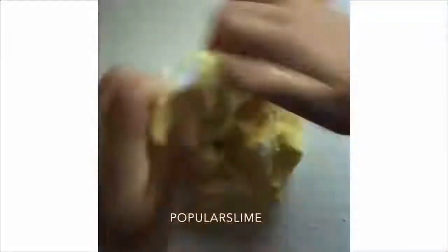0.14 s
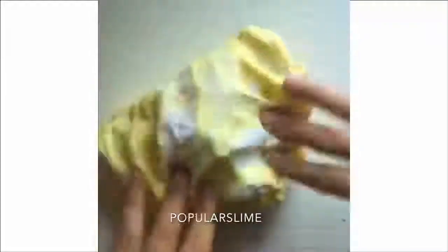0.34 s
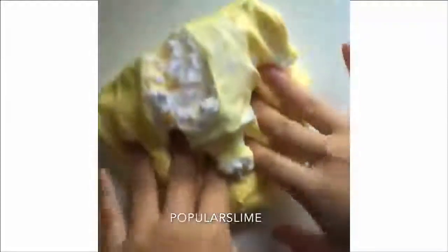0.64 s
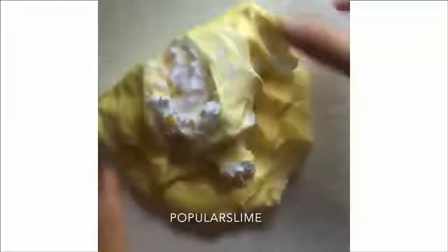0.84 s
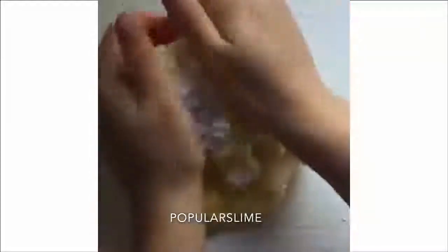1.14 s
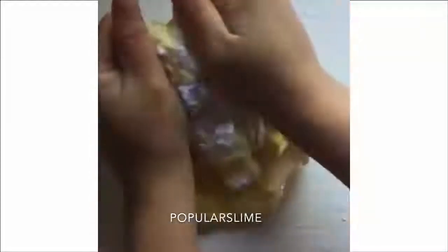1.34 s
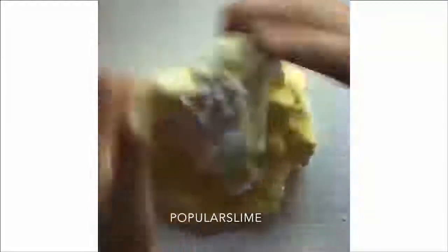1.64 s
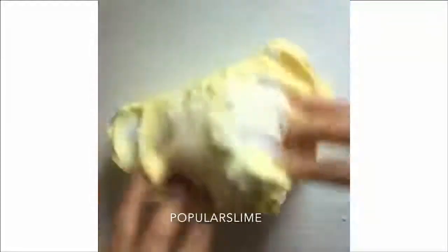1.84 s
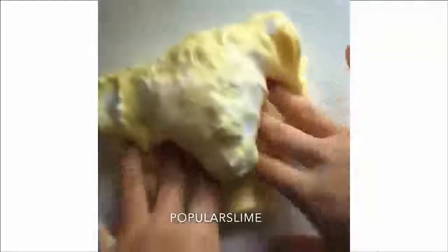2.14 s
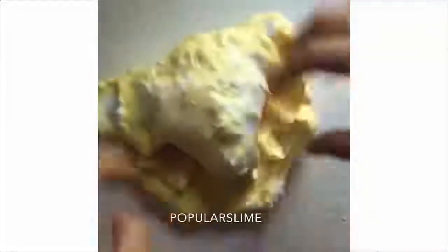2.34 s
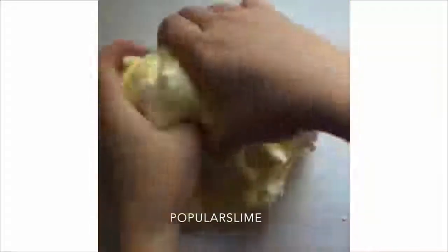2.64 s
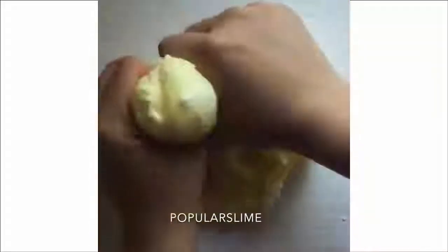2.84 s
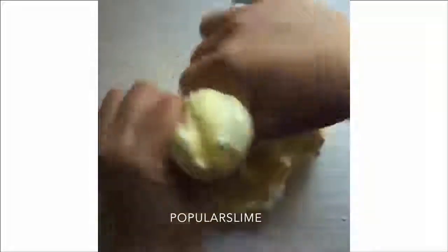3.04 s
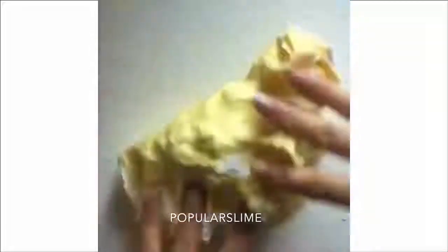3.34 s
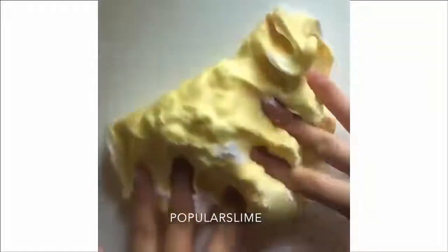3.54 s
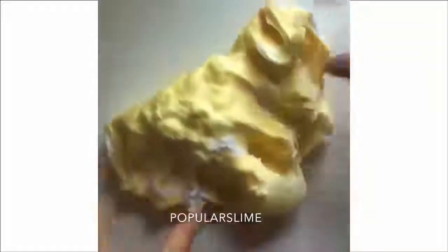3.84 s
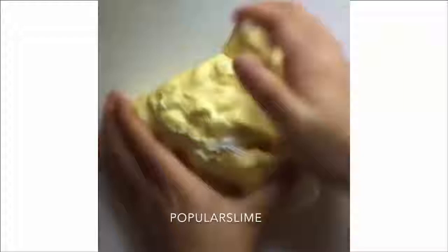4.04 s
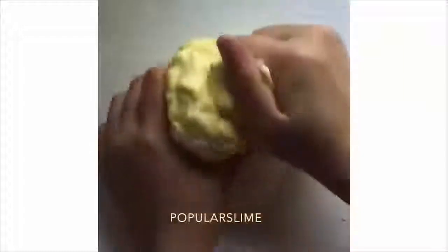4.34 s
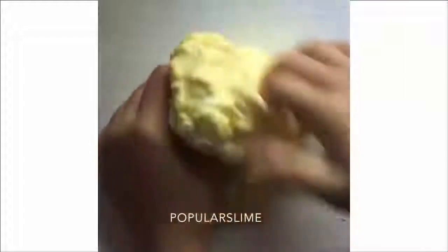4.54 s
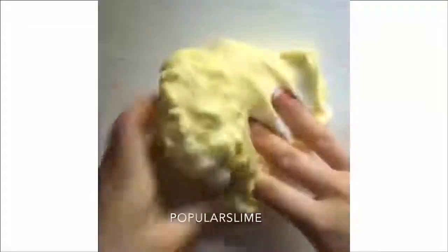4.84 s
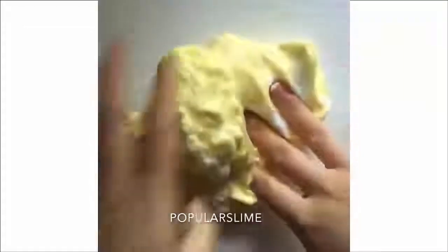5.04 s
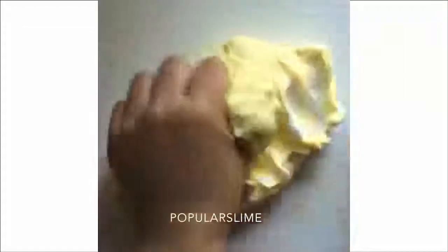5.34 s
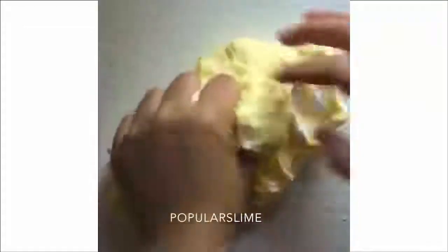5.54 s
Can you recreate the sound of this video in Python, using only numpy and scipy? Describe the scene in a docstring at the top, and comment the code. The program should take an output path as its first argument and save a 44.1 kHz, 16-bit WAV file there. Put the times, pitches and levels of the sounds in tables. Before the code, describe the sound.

A burst of loud, snapping pops opens as hands squeeze airy slime close to the microphone. Short, fizzy squelches follow in uneven strokes, mixed with hollow palm slaps, small gurgles and low thuds from the table. More clusters of bursting air pockets come about every second and a half, then a tiny air squeak and a final pop. The room is quiet, with faint hiss and little echo.

```python
"""Air pockets burst in a lump of thick, airy slime as two hands knead it, close to a small microphone.
Palms land with hollow slaps and squeeze until the pockets tear, the loudest overloading the microphone.
Fingers crush the foam into a squelch and fizz of tiny bubbles, air gurgles through folds, and the table
thuds and rumbles in a quiet room. Near the end, air squeaks out through a slit."""
import sys
import numpy as np
from scipy import signal
from scipy.fft import rfft, irfft, next_fast_len
from scipy.io import wavfile
from scipy.ndimage import map_coordinates

SR = 44100
rng = np.random.default_rng(int(sys.argv[2]) if len(sys.argv) > 2 else 0)


def wrap_up_sound(samples):
    """Save the sound to the file named by the first command line argument, as 16-bit audio."""
    columns = np.atleast_2d(samples).T
    # keep every value between -1 and 1, then stretch to whole-number steps
    tamed = np.clip(columns, -1, 1)
    steps = np.round(tamed * 32767).astype(np.int16)
    wavfile.write(sys.argv[1], SR, steps)


N = 251370
TOP_HZ = 14150  # band limit


def amp(db):
    """Decibels to gain."""
    return 10 ** (np.asarray(db) / 20)


def unit(x):
    """Scale to rms 1."""
    return x / np.sqrt(np.mean(x ** 2) + 1e-20)


def along(points, hz):
    """Read a curve of (freq_hz, value) points on a log frequency axis."""
    freqs, values = np.transpose(points)
    return np.interp(np.log(hz + 1), np.log(freqs), values)


def add(track, start_s, sound):
    """Lay a sound into a track."""
    part = track[max(0, round(start_s * SR)):][:len(sound)]
    part += sound[:len(part)]


def filtered(x, response):
    """Filter x by a complex response of frequency."""
    size = next_fast_len(len(x) + SR // 10)
    return irfft(rfft(x, size) * response(np.fft.rfftfreq(size, 1 / SR)), size)[:len(x)]


def coloured(x, eq):
    """x through an EQ curve of (freq_hz, gain_db) points, at rms 1."""
    return unit(filtered(x, lambda hz: amp(along(eq, hz))))


def causal(gain):
    """Minimum-phase impulse response of a gain curve."""
    cepstrum = irfft(np.log(gain + 1e-6))
    half = len(cepstrum) // 2
    folded = np.r_[cepstrum[0], 2 * cepstrum[1:half], np.zeros(half)]
    return irfft(np.exp(rfft(folded)))


def resonance(f, hz, width):
    """Response of one damped mode."""
    return 1j * f * width / (hz * hz - f * f + 1j * f * width)


def swell(length_s):
    """A soft rise and fall that lasts about length_s."""
    u = np.arange(int(2 * length_s * SR)) / (0.47 * length_s * SR)
    return u ** 2 * np.exp(2 - 2 * u)


def wobble(per_second):
    """A smooth random curve with so many knots a second."""
    knots = rng.standard_normal(int(N * per_second / SR) + 4)
    return map_coordinates(knots, [np.arange(N) * per_second / SR])


# EQ of the noise floor: freq_hz, gain_db
ROOM_TONE_EQ = [(18, -36), (30, -6.5), (65, -6), (172, -4), (435, -19), (1190, -23.5), (6470, -28.5),
                (10600, -31), (12600, -28), (14000, -35)]


def room_tone(level_db=-59):
    """A faint, steady bed of low noise and hiss."""
    return amp(level_db) * coloured(rng.standard_normal(N), ROOM_TONE_EQ)


# Reverb time of the walls: freq_hz, t60_s
WALL_DECAY = [(200, 0.12), (2000, 0.39), (6000, 0.34), (13000, .28)]


def room_reverb(x, near_db=-11, near_t60_s=0.054, far_db=-17, blocks=20):
    """Hands and table scatter the sound, the walls add a faint tail; the paths change as the hands move."""
    out, step = np.zeros(N), N // blocks + 1
    for start in range(0, N, step):
        hz, t, bands = signal.stft(rng.standard_normal(SR // 2), SR, nperseg=256)
        decay = amp(-60 * t / along(WALL_DECAY, hz)[:, None])
        tail = signal.istft(bands * decay, SR, nperseg=256)[1]
        t = np.arange(len(tail)) / SR
        tail *= 1 - np.exp(-t / 0.015)
        near = rng.standard_normal(len(t)) * amp(-60 * t / near_t60_s) * (t > .004)
        impulse = amp(far_db) * tail / np.linalg.norm(tail) + amp(near_db) * near / np.linalg.norm(near)
        add(out, start / SR, signal.fftconvolve(x[start:start + step], impulse))
    return out


# Drags of the lump over the table: start_s, level_db, length_s
DRAGS = [(0.36, -48, 0.084), (0.867, -35, 0.089), (1.086, -43.5, 0.095), (1.16, -34.5, 0.057),
         (1.427, -42, 0.069), (1.87, -41, 0.066), (2.433, -36.5, .13), (3.245, -35.5, 0.12),
         (3.72, -47, 0.066), (3.872, -34.5, 0.0886), (4.116, -53, 0.19), (5.048, -36.5, 0.079),
         (5.316, -41, 0.096)]
# EQ of the drag rumble: freq_hz, gain_db
RUMBLE_EQ = [(15, -40), (25, -20), (65, -0.5), (86, -4), (135, -13.5), (190, -4), (242, -34.5), (320, -37),
             (420, -58.5), (700, -120)]
# Pushes booming through lump and table, plus at 2.718 s the low thump of air trapped under a palm: start_s,
# level_db, length_s, pitch_hz
PUSHES = [(0.078, -30, 0.023, 192), (0.885, -29, 0.037, 171.2), (0.912, -21.5, 0.04, 175.6),
          (1.072, -17, 0.033, 181), (1.21, -45.5, 0.089, 178), (1.328, -44.5, 0.04, 180),
          (2.422, -19.5, 0.035, 171), (2.472, -20.5, 0.027, 170.3), (2.66, -35, 0.037, 175),
          (2.718, -27.5, 0.025, 283.5), (3.245, -34.5, 0.086, 162.7), (3.852, -27.5, 0.062, 171.3),
          (4.08, -23.5, 0.038, 177.5), (4.105, -26.5, 0.062, 181), (4.2, -31.5, 0.078, 182),
          (4.51, -36.5, 0.034, 184), (4.97, -31.5, 0.085, 167), (5.045, -34.5, 0.076, 176),
          (5.305, -35.5, 0.067, 173.6), (5.585, -35.5, 0.0099, 227)]


def table_top(rest_db=-56, roughness=0.33):
    """The table top rumbles as the lump is dragged and booms under each push; one boom is the low thump of air
    trapped under a palm."""
    motion = np.full(N, amp(rest_db))
    for start_s, level_db, length_s in DRAGS:
        add(motion, start_s, amp(level_db) * swell(length_s))
    out = motion * coloured(rng.standard_normal(N), RUMBLE_EQ)
    drag_eq = [(30, -17), (70, 1), (200, 1.5), (320, -8.5), (600, -23), (2000, -72)]
    for start_s, level_db, length_s, pitch_hz in PUSHES:
        push = swell(length_s)
        boom = np.sqrt(2) * np.sin(2 * np.pi * pitch_hz * np.arange(len(push)) / SR)
        drag = coloured(rng.standard_normal(len(push)), drag_eq)
        add(out, start_s, amp(level_db) * push * (boom + roughness * drag))
    return out


# Puffs of air squeezed through folds: start_s, level_db, length_s, centre_hz
PUFFS = [(0.323, -30.5, 0.033, 2350), (0.865, -44.5, 0.022, 2600), (1.235, -51, 0.018, 1900),
         (2.15, -43, 0.0077, 1337), (2.18, -47, 0.013, 4900), (2.396, -47, 0.032, 2430),
         (2.42, -32.5, 0.011, 3730), (2.769, -52, 0.041, 2150), (3.249, -28, 0.031, 1245),
         (3.838, -42.5, 0.025, 1148), (3.884, -33, 0.025, 1215), (4.206, -48, 0.013, 2970),
         (4.315, -42.5, 0.017, 1090), (4.435, -41, 0.017, 890), (4.47, -43, 0.0067, 1060),
         (4.646, -37.5, 0.075, 1030), (4.689, -32, 0.02, 3700), (5.003, -30.5, 0.025, 1120)]


def gurgles(fold_q=2.9):
    """Air slips through a fold, which colours it with one broad resonance."""
    out = np.zeros(N)
    for start_s, level_db, length_s, hz in PUFFS:
        flow = swell(length_s)
        air = filtered(rng.standard_normal(len(flow)), lambda f: resonance(f, hz, hz / fold_q) ** 2)
        add(out, start_s, amp(level_db) * flow * unit(air))
    return out


# Pitch and level envelope of the squeak: time_s, pitch_hz, level_db
SQUEAK_ENVELOPE = [(5.385, 2027, -67), (5.401, 1880, -37), (5.406, 1902, -18), (5.411, 1878, -13),
                   (5.419, 1874, -17), (5.425, 1790, -35), (5.434, 1780, -75)]


def squeak(second_db=-27, third_db=-36):
    """Escaping air flutters the lips of a slit: a falling, nearly pure tone."""
    t = np.arange(N) / SR
    time_s, pitch_hz, level_db = np.transpose(SQUEAK_ENVELOPE)
    phase = 2 * np.pi * np.cumsum(np.interp(t, time_s, pitch_hz)) / SR
    tone = np.sin(phase) + amp(second_db) * np.sin(2 * phase) + amp(third_db) * np.sin(3 * phase)
    gate = (t > time_s[0]) * (t < time_s[-1])
    return np.sqrt(2) * amp(np.interp(t, time_s, level_db)) * tone * gate


# Modes of the hollow under a palm: pitch_hz, width_hz, gain_db
PALM_MODES = [(290.7, 27, -1.5), (648, 49, 0.5), (770, 110, -9), (1004, 65, -7), (1330, 81, -15.5),
              (1800, 150, -18)]
# Palms landing on the slime: start_s, level_db, t60_s, pitch_ratio
PALM_HITS = [(1.074, -20.5, 0.29, 1.01), (1.1, -25.5, 0.17, 0.95), (2.66, -33, 0.19, 0.94),
             (2.721, -27.5, 0.17, 0.81), (4.081, -24, 0.12, 0.96), (4.112, -32.5, 0.25, 1.01)]


def slaps(attack_s=.001, smack_db=-7, smack_t60_s=0.094):
    """A soft palm traps air against the slime: a short, hollow body under a faint smack."""
    def hollow(f):
        return sum((-1) ** k * amp(db) * resonance(f, hz, width)
                   for k, (hz, width, db) in enumerate(PALM_MODES))

    out, t = np.zeros(N), np.arange(SR // 4) / SR
    smack_eq = [(300, 6.5), (1500, 1.5), (4000, -13), (13000, -26)]
    for start_s, level_db, t60_s, pitch_ratio in PALM_HITS:
        noise = rng.standard_normal(len(t))
        body = unit(filtered(noise, lambda f: hollow(f / pitch_ratio) / (1 + (f / 2200) ** 4)))
        body *= amp(-60 * t / t60_s) * (1 - np.exp(-t / attack_s))
        smack = coloured(rng.standard_normal(len(t)), smack_eq) * amp(smack_db - 60 * t / smack_t60_s)
        add(out, start_s, amp(level_db) * (body + smack))
    return out


def sticky_ticks(per_second=130, spread_db=15.5, t60_s=0.022):
    """Sticky skin lets go of the fingers in sparse, sharp ticks."""
    out, t = np.zeros(N), np.arange(SR // 60) / SR
    for when, size in rng.random((int(per_second * N / SR), 2)):
        envelope = amp(spread_db * size - 60 * t / t60_s)
        add(out, when * N / SR, envelope * rng.standard_normal(len(t)))
    return unit(out)


def bubbles(per_second, low_hz, high_hz, cycles, level_spread=3):
    """Countless tiny cells of uneven size, each ringing for a few cycles at its own pitch."""
    when, pitch, softness, phase = rng.random((int(per_second * N / SR), 4)).T[:, :, None]
    hz = low_hz * (high_hz / low_hz) ** pitch
    n = np.arange(SR // 120)
    turns = hz * n / SR
    gain = amp(-level_spread * np.log(.04 + .96 * softness)) * hz  # many soft, a few loud
    envelope = amp(-60 * turns / cycles) * (1 - np.exp(-2 * turns)) * (1 - n / len(n))
    grains = gain * envelope * np.sin(2 * np.pi * (turns + phase))
    positions = (when * N).astype(int) + n
    return unit(np.bincount(positions.ravel(), grains.ravel(), N + len(n))[:N])


# Finger strokes through the foam: start_s, length_s, squelch_db, fizz_db, effort_change_db
FINGER_STROKES = [(0.01, 0.18, -33.5, -37, -4), (0.277, 0.12, -33, -34, -6.5), (0.696, 0.1, -47, -59, -12),
                  (0.894, .048, -27.5, -29.5, -9), (1.162, 0.098, -43, -48.5, 1.5), (1.31, .1, -57, -62, 3),
                  (1.446, 0.32, -40.5, -40, -0.5), (1.794, 0.11, -34, -33, -10),
                  (2.161, 0.17, -62, -60.5, -1.5), (2.431, 0.041, -23.5, -29.5, -8),
                  (2.69, 0.23, -62.5, -64.5, 1.5), (2.982, 0.3, -39, -35.5, -25),
                  (3.23, .1, -29, -30.5, -4.5), (3.369, 0.066, -50, -49, -1),
                  (3.854, 0.061, -37.5, -37.5, 3.5), (4.203, 0.15, -57, -56.5, 3),
                  (4.331, 0.305, -56.5, -52, 12), (4.679, 0.1, -36.5, -35.5, -5.5),
                  (4.911, 0.077, -33.5, -37, -2), (5.01, 0.093, -29, -34, -7.5),
                  (5.315, 0.081, -29, -35, -10.5), (5.616, 0.078, -32, -62, -9.5)]


def crushing(grip_db_per_s=678.5, release_db_per_s=394, usual_stroke_s=0.17):
    """Squelch and fizz envelopes: each stroke grips, presses on with changing effort and lets go."""
    t = np.arange(N) / SR
    squelch, fizz = amp(-62), amp(-68.5)  # the foam settling between strokes
    for start_s, length_s, squelch_db, fizz_db, change_db in FINGER_STROKES:
        grip_db = grip_db_per_s * np.minimum(t - start_s, 0)
        release_db = release_db_per_s * np.minimum(start_s + length_s - t, 0)
        pace = (usual_stroke_s / length_s) ** .5  # shorter strokes grip and let go faster
        progress = np.clip((t - start_s) / length_s, 0, 1)
        effort = amp(pace * (grip_db + release_db) + change_db * progress)
        squelch = np.hypot(squelch, amp(squelch_db) * effort)
        fizz = np.hypot(fizz, amp(fizz_db) * effort)
    return squelch, fizz


# EQ of the wet mids from large cells: freq_hz, gain_db
SQUELCH_EQ = [(150, -30), (250, -3.5), (443, -7.5), (634, -5.5), (764, -6.5), (1020, -3), (1230, -3.5),
              (1450, -10), (2130, -6), (6000, -16.5), (7800, -39.5), (13200, -120)]
# EQ of the crisp top from small cells: freq_hz, gain_db
FIZZ_EQ = [(2650, -22), (4500, -2), (7520, -3), (8230, -3), (10500, -8), (11800, -4.5), (14000, -7.5)]


def foam(trim_db=-1, stickiness=0.46, fizz_lumpiness=0.59):
    """Crushed foam: larger cells squelch in lumps and the smallest fizz, over a bed of escaping air."""
    squelch, fizz = crushing()
    ticks = stickiness * sticky_ticks()
    large = bubbles(1900, low_hz=450, high_hz=7000, cycles=13) + ticks + .65 * rng.standard_normal(N)
    small = bubbles(1200, low_hz=4000, high_hz=14000, cycles=18) + ticks + rng.standard_normal(N)
    lumps_db = 1.5 * wobble(per_second=70)  # the slime yields unevenly
    squelch *= amp(lumps_db) * coloured(large, SQUELCH_EQ)
    fizz *= amp(fizz_lumpiness * lumps_db) * coloured(small, FIZZ_EQ)
    return amp(trim_db) * (squelch + fizz)


# Bursting air pockets: start_s, level_db, cavity_hz, body_db, snap_db, t60_s
AIR_POCKETS = [(0.02, -26, 5470, 6.5, 3, 0.029), (0.0418, -7, 6740, 0, -17.5, 0.029),
               (0.077, -5, 2500, 13, -4, 0.014), (0.092, -2, 6460, -3, -7.5, 0.033),
               (0.098, -2.5, 2370, -22.5, -14, 0.034), (0.107, -5.5, 6100, -6, -2, 0.026),
               (0.131, -13.5, 2220, 5, 8.5, 0.016), (0.153, -18.5, 1700, -2, 0.5, 0.018),
               (0.334, -23, 5860, 18, -10, 0.11), (0.6101, -38, 1190, -9, 2.5, 0.033),
               (0.7, -20, 2620, -0.5, -21.5, .014), (1.168, -29.5, 2400, 25.5, 8, .035),
               (1.39, -48.5, 1928, -4, -1, 0.037), (1.414, -45, 1380, -13.5, -17, 0.027),
               (1.4383, -5.5, 2620, -7.5, -20.5, .019), (1.486, -18.5, 5200, 1.5, -7, 0.011),
               (1.5257, -8, 7000, 0, -3, 0.03), (1.543, -16.5, 6700, 6, 4.5, 0.044),
               (1.583, -28.5, 6250, -8.5, 9, .03), (1.618, -20.5, 2000, -15, 7.5, 0.019),
               (1.632, -25, 2430, -13, 8, 0.042), (1.661, -19.5, 1950, -3.5, -8.5, 0.03),
               (2.07, -42, 6320, 6, 0, .036), (2.222, -52, 12000, 7, 6, 0.041),
               (2.828, -46.5, 5700, 11, 20, 0.026), (2.89, -45, 12230, 9.5, -9, 0.048),
               (2.914, -35.5, 6340, 5, -5, 0.031), (2.9793, -12.5, 8700, 0.5, 3.5, 0.025),
               (3.001, -22.5, 1290, 8.5, 3, .03), (3.0332, -10, 12900, 6, -1.5, 0.014),
               (3.048, -18.5, 2530, -18, 1.5, .026), (3.065, -13, 1900, -11.5, 9.5, 0.023),
               (3.088, -18.5, 1560, -18, -8, 0.023), (4.341, -36.5, 1360, -16, -5, 0.011),
               (4.348, -33, 1210, -17, -8, .021), (4.379, -43.5, 1380, -14, 6, 0.025),
               (4.415, -32, 1730, -5, 8.5, 0.033), (4.436, -38, 3120, 5, 3, 0.063),
               (4.45, -29.5, 9200, -3, 8, 0.027), (4.49, -32.5, 1470, -36, -4, 0.024),
               (4.522, -37.5, 5340, -0.5, 12, 0.022), (4.555, -20.5, 6000, 8.5, 10, 0.042),
               (4.563, -24.5, 5200, 11, 2, .037), (4.5836, -13.5, 1460, -7, -0.5, 0.027),
               (4.866, -36.5, 1980, -26, 0.5, 0.014), (5.086, -29.5, 2600, 19, 5, 0.046),
               (5.4755, -25, 2630, 7.5, -3.5, 0.018), (5.506, -32.5, 1810, -9, 6, 0.037),
               (5.5253, -21, 2250, -13.5, 7, 0.017), (5.59, -6, 1340, -6, -14, 0.024),
               (5.606, -17.5, 3350, -1, -30, 0.026)]


def pops(rupture=3.8, opening_s=.0002, cavity_q=3.3, level_window_s=0.0098):
    """Each skin tears with one sharp push and a dying flutter; the pocket behind it rings."""
    out, t = np.zeros(N), np.arange(SR // 16) / SR
    f = np.fft.rfftfreq(1024, 1 / SR)
    lowpass = 1 / np.sqrt(1 + (f / TOP_HZ) ** 20)
    for start_s, level_db, cavity_hz, body_db, snap_db, t60_s in AIR_POCKETS:
        tear = rng.standard_normal(len(t)) * amp(-60 * t / t60_s) * (1 - np.exp(-t / opening_s))
        tear[round(opening_s * SR)] = rupture
        skin = amp(along([(60, body_db - 18.5), (290, body_db - 3), (450, body_db - 7),
                          (1500, body_db), (5000, 0), (11000, snap_db)], f))
        ring_db = 7 - 0.23 * level_db  # a gentle pop leaves its pocket whole, so it rings more
        cavity = np.abs(1 + (amp(ring_db) - 1) * resonance(f, cavity_hz, cavity_hz / cavity_q))
        echo_s = rng.uniform(.0004, .0012)  # reflection off the nearby palm
        comb = np.abs(1 + .3 * np.exp(2j * np.pi * f * echo_s))
        pop = signal.fftconvolve(tear, causal(skin * cavity * comb * lowpass))
        pop *= amp(level_db) * np.sqrt(level_window_s * SR / np.sum(pop ** 2))
        add(out, start_s, pop)
        add(out, start_s - .0015, amp(-20.5) * pop)  # a faint copy 1.5 ms early softens the onset
    return out


def scene(covered_send_db=-7):
    """Mono mix of slime, table and room; less of the sound made under the hands reaches the walls."""
    exposed = pops() + slaps() + squeak()
    covered = foam() + gurgles()
    reverb = room_reverb(exposed + amp(covered_send_db) * covered)
    return (exposed + covered + reverb + table_top() + room_tone())[None]


def record(dry, hardness=10., low_cut_hz=42):
    """The microphone clips the loudest pops; a low cut drops the sub bass and a steep filter caps the top."""
    clipped = dry[0] / (1 + np.abs(dry[0]) ** hardness) ** (1 / hardness)
    low_cut = filtered(clipped, lambda hz: hz ** 2 / np.sqrt(hz ** 4 + low_cut_hz ** 4))
    return filtered(low_cut, lambda hz: 1 / np.sqrt(1 + (hz / TOP_HZ) ** 140))[None]


dry = scene()
out = record(dry)
wrap_up_sound(out)
```